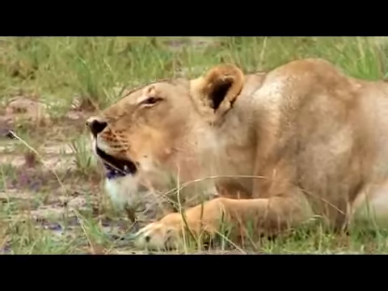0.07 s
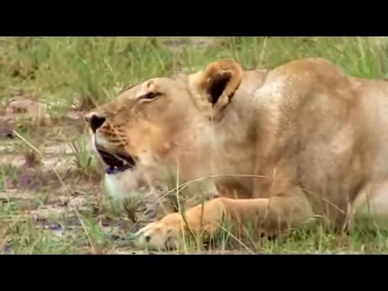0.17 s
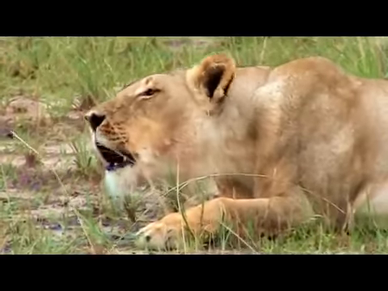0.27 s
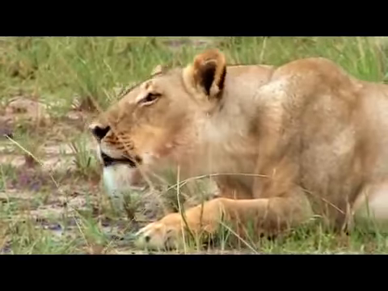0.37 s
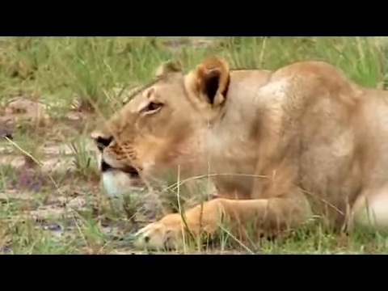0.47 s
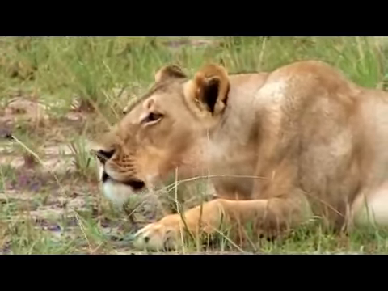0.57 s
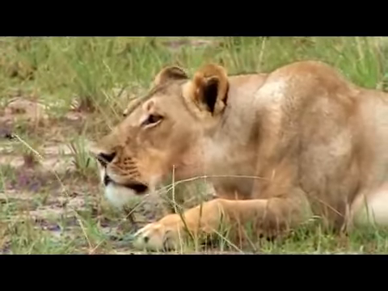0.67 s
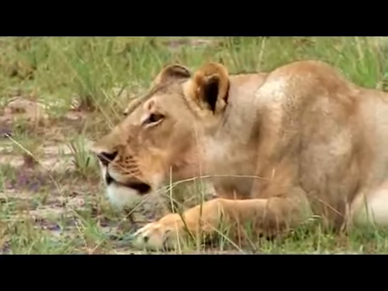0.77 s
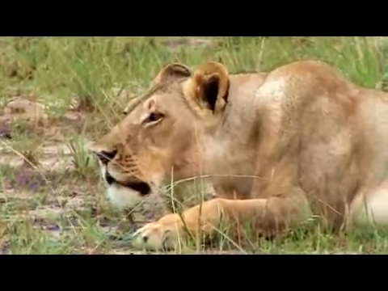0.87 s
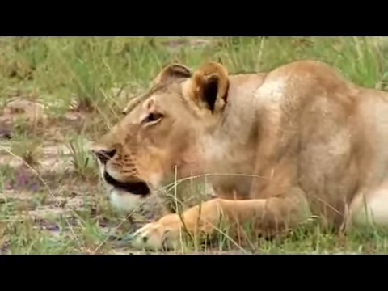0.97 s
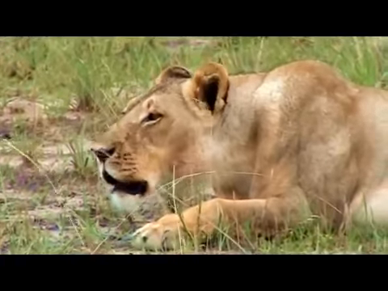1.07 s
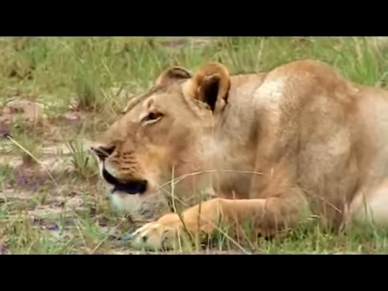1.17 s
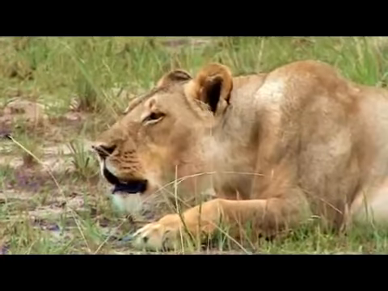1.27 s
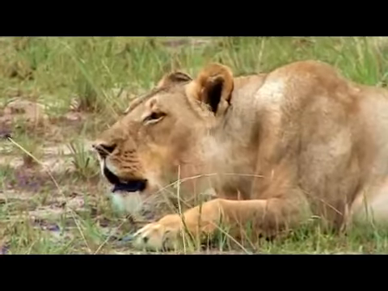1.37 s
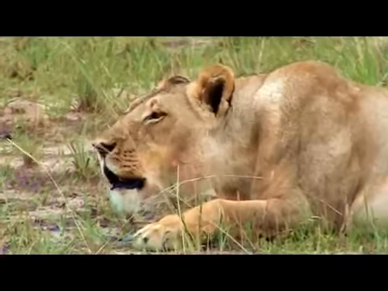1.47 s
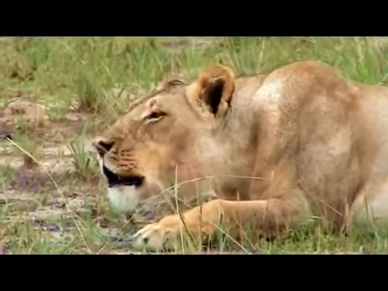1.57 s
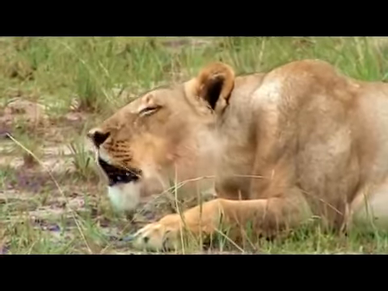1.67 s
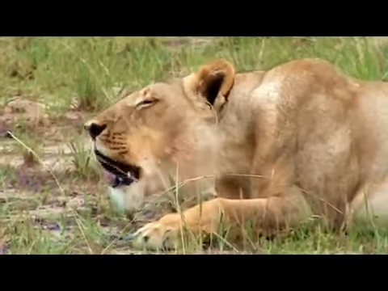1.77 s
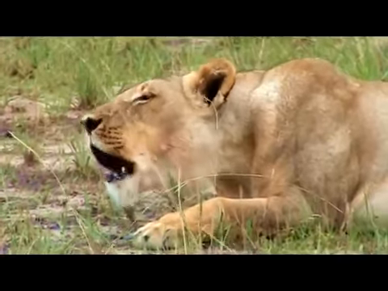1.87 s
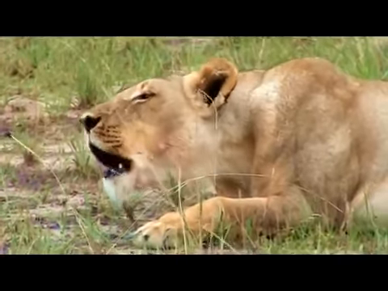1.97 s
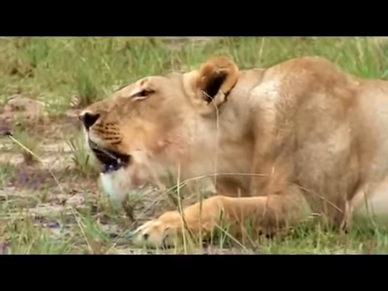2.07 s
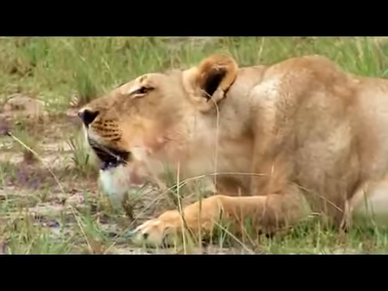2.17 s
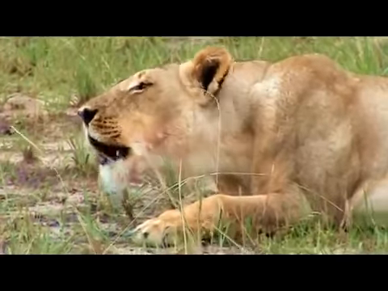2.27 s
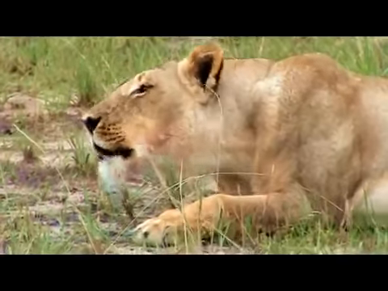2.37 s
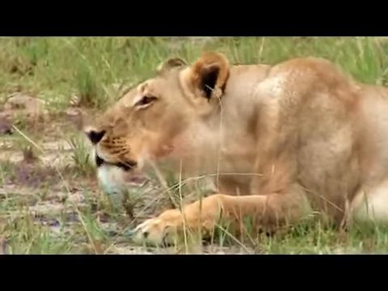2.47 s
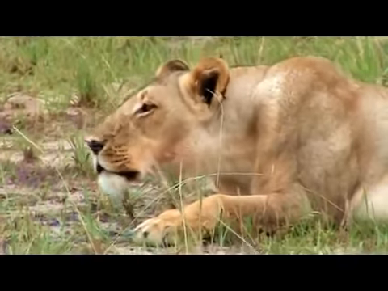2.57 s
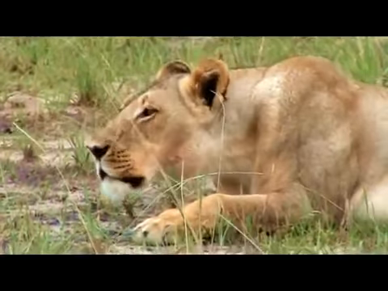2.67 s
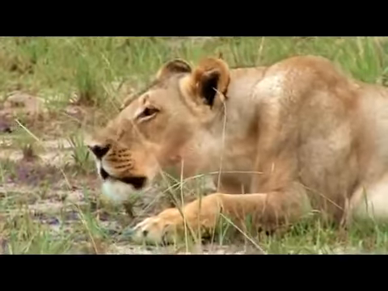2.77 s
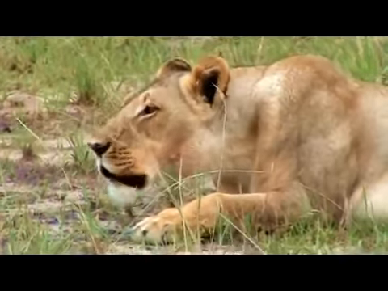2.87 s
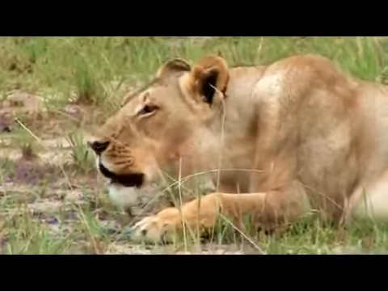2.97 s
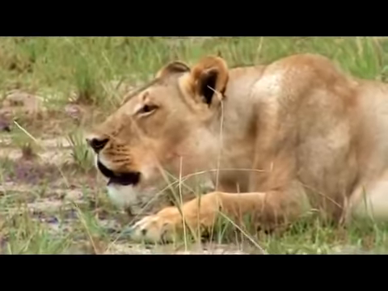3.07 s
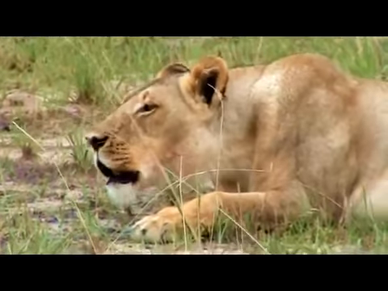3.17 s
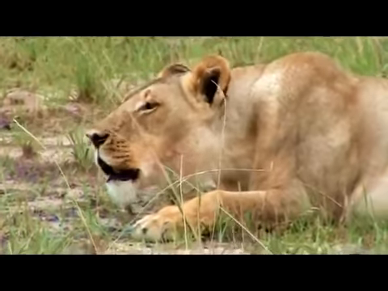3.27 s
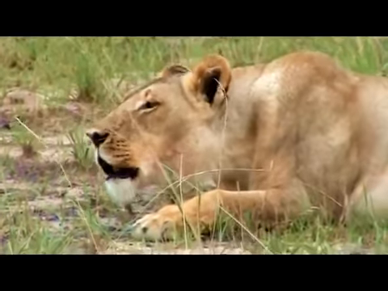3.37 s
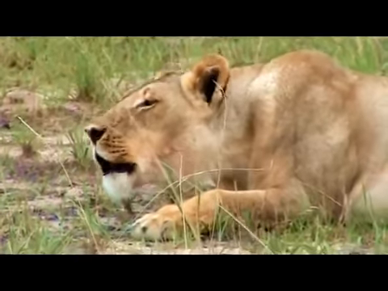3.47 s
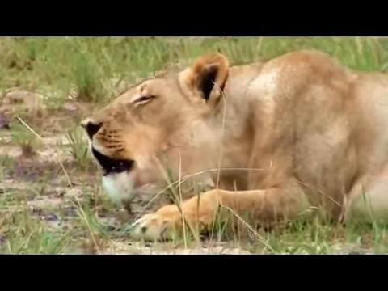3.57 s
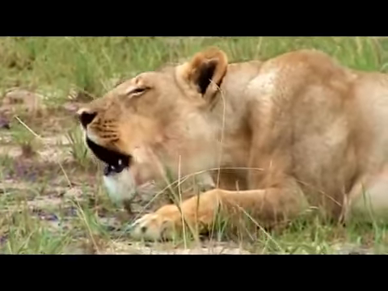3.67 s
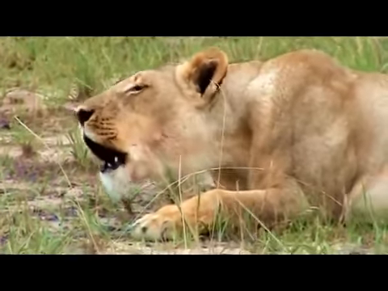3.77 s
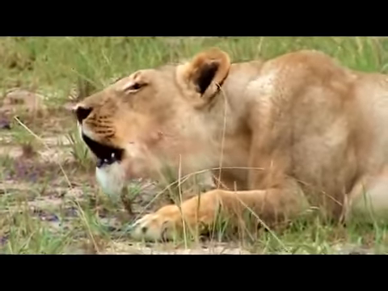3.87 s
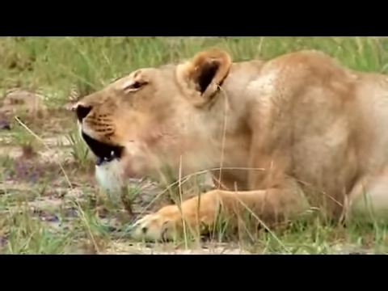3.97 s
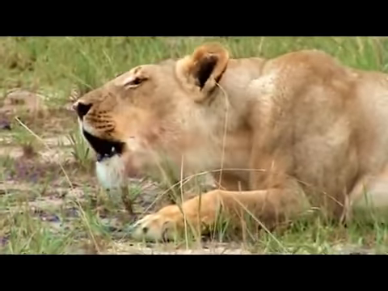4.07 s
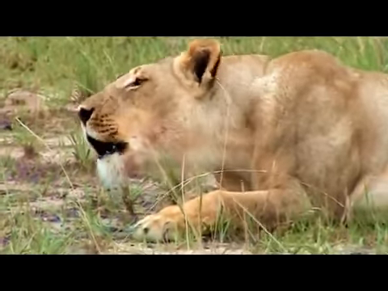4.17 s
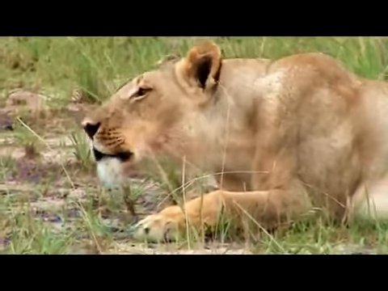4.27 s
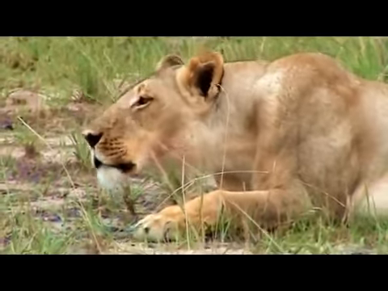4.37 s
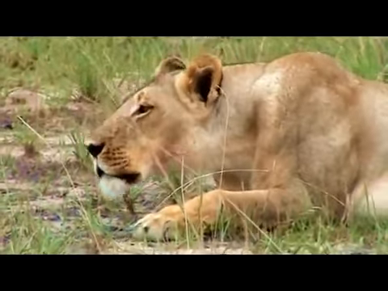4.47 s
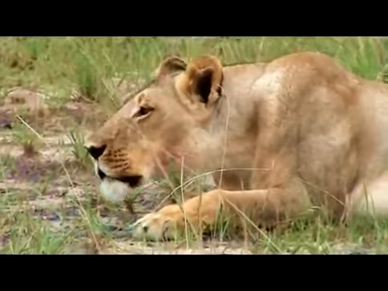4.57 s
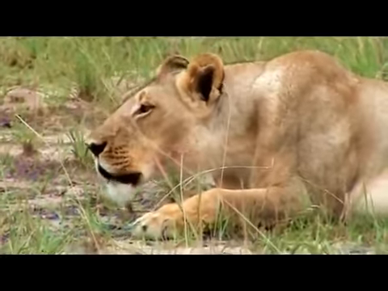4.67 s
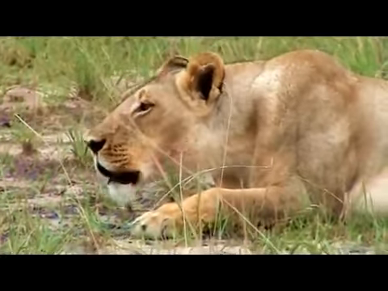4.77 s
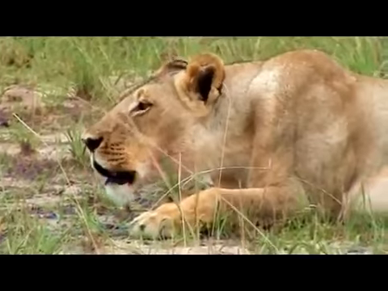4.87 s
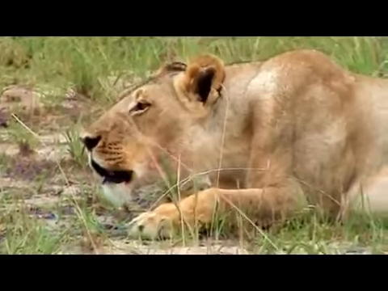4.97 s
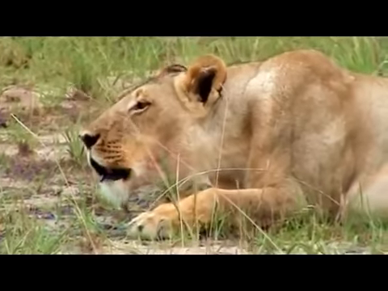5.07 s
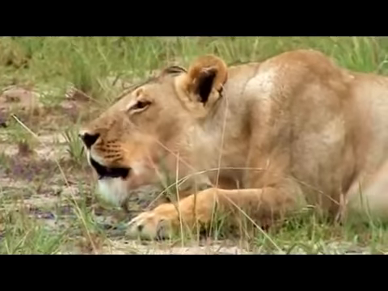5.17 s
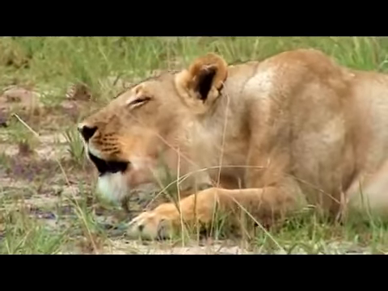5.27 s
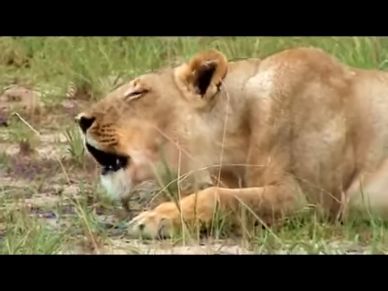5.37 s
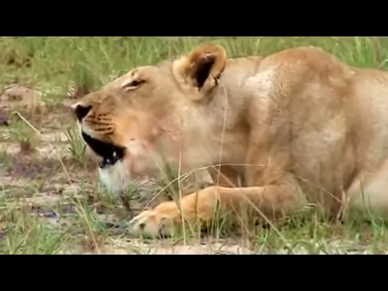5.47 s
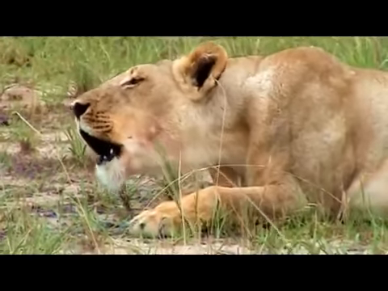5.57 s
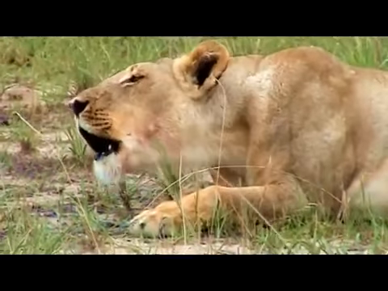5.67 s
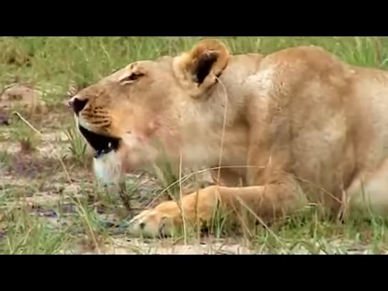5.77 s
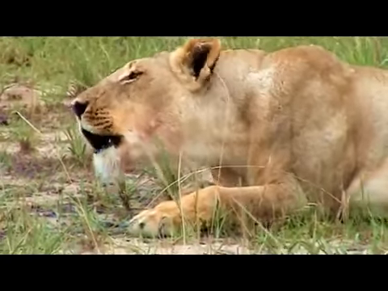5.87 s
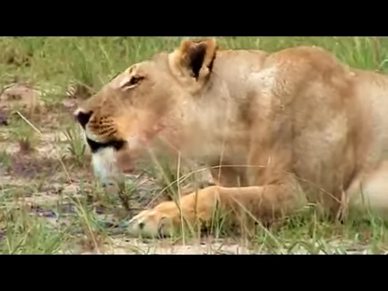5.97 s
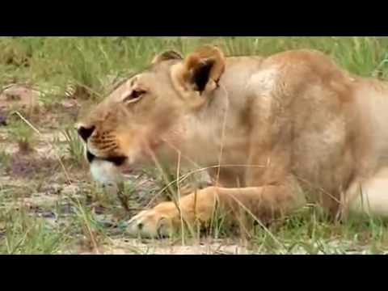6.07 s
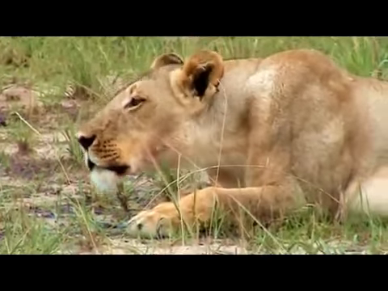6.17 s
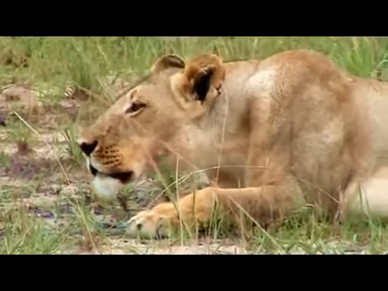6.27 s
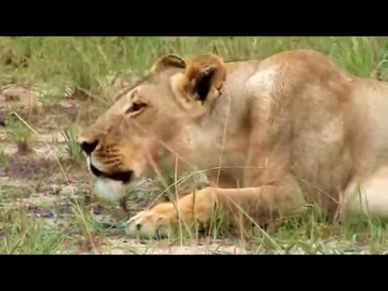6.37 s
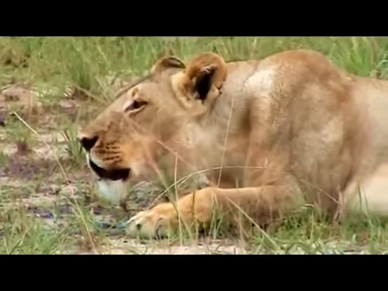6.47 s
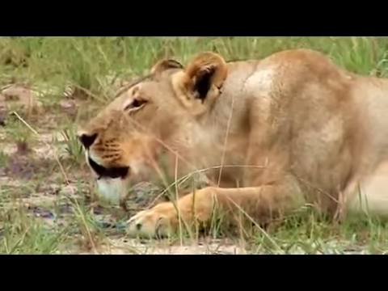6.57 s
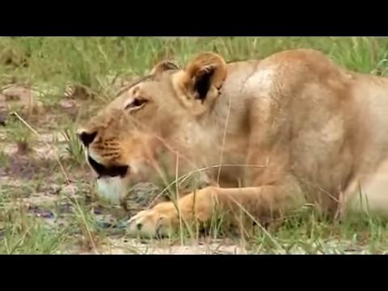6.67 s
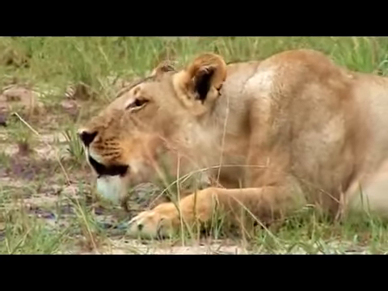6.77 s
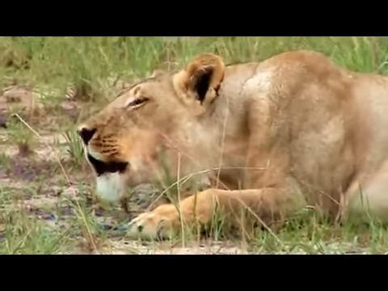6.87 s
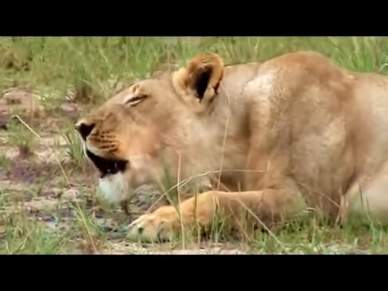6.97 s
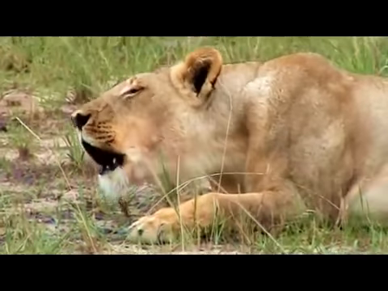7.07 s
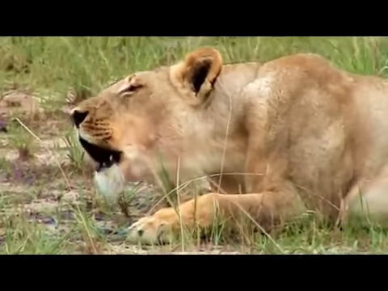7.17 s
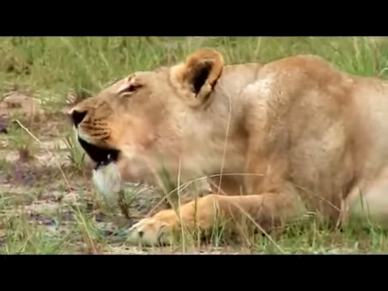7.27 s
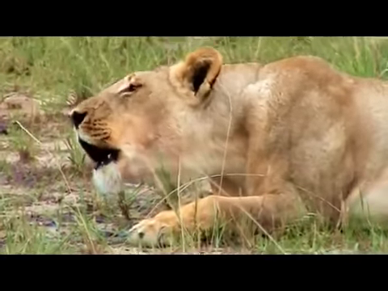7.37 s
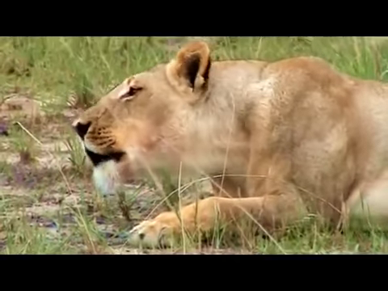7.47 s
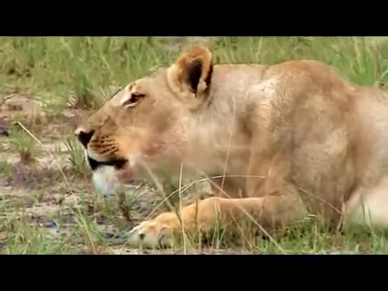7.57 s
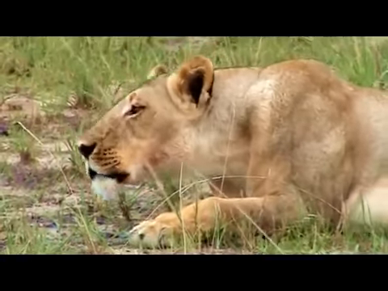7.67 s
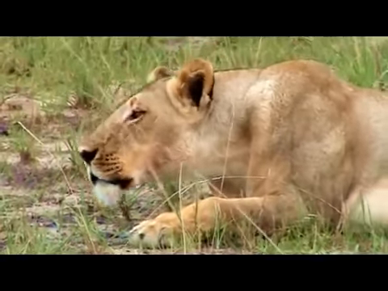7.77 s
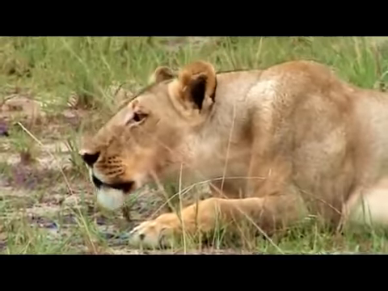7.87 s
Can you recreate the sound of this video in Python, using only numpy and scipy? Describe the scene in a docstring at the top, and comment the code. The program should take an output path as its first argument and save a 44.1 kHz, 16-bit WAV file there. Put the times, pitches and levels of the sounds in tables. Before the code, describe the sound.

A lioness roars five times close by in open grassland, with a dark echo and faint birds and insects between.

```python
"""A lioness roars on the plain

A lioness lies in open grassland and roars five times, close to the microphone. Her heavy vocal folds
ring her throat and mouth: each roar starts hoarse, locks into a clean low moan, breaks into a rasp
and ends in a slack flutter. Her tongue and lips click wetly. The plain returns a long dark echo;
small birds, insects, distant air and an electric hum sound faintly between the roars."""
import sys
import numpy as np
from scipy import signal
from scipy.fft import rfft, irfft, next_fast_len
from scipy.io import wavfile
from scipy.ndimage import uniform_filter1d

SR = 44100
rng = np.random.default_rng(int(sys.argv[2]) if len(sys.argv) > 2 else 0)


def to_wav(sig):
    """Store sig (one row per channel, or 1-D mono) as 16-bit WAV at the path in sys.argv[1].

    Samples outside -1..1 are clipped; the rate is SR.
    """
    pcm = np.clip(np.atleast_2d(sig), -1, 1) * 32767
    pcm = np.round(pcm).astype(np.int16)
    wavfile.write(sys.argv[1], SR, pcm.T)  # frames by channels


N = 348831


def lioness(flutter_lag_s=.043):
    """Five roars, each with a flutter just after she lets go, and wet clicks of tongue and lips."""
    # The roars: start_s, moan_s, rasp_s, release_s, crest_s (top of the pitch arch), crest_hz,
    # moan_roughness (0-1), moan_brightness_db, widest_jaw (0-1)
    roars = [(-.146, .067, .289, .507, -.01, 220, .1, .8, .85),
             (1.837, 2.009, 2.315, 2.534, 2.085, 210, .08, 2, 1),
             (3.718, 3.924, 4.176, 4.38, 3.975, 198, 0.07, -.3, .92),
             (5.475, 5.668, 5.928, 6.104, 5.735, 192, .1, -1.4, .88),
             (7.112, 7.325, 7.452, 7.666, 7.37, 186, .24, 1, .5)]
    # The clicks: start_s, relative_level_db, relative_treble_db
    smacks = [(1.032, -57.5, 16), (2.344, -40.5, 10), (2.546, -31.5, -13), (2.604, -51, -5),
              (4.487, -49.5, -6.5), (6.178, -42, -13.5), (6.29, -35, -23.5)]
    out = np.zeros(N)
    for row in roars:
        release_s = row[3]
        add(out, *roar(row))
        add(out, *flutter(release_s + flutter_lag_s))
    for row in smacks:
        add(out, *smack(*row))
    return out


def roar(row, puff_gain=4.4, dip_half_s=.011):
    """Heavy vocal folds swing evenly or chaotically; their pulses and puffs of air ring the throat."""
    # Resonances of the long throat, the upper mouth and the teeth: shut_hz, open_hz, width_hz, level_db
    throat_tones = [(245, 266, 110, -.5), (405, 475, 55, 5.5), (500, 545, 48, 1), (566.5, 690, 60, -.5),
                    (813, 850, 61.4, 2), (911.4, 965, 82, -1.2), (1204, 1265, 130, -10)]
    mouth_tones = [(1380, 1800, 120, -1), (1810, 1850, 260, -2.5), (2060, 2600, 300, -8),
                   (2405, 2680, 190, -2.5), (3130, 2950, 140, 0)]
    teeth_tones = [(5620, 6800, 600, 1), (7000, 8600, 1200, -2.5)]
    # Rushing air in the rasp and in the clean moan: pitch_hz, level_db
    rasp_air = [(1940, -33.5), (3300, -2.5), (4060, -4), (4470, -2.5), (4850, -7), (5790, 0.5),
                (6840, -2.5), (7370, -2), (10900, -12.5), (12200, -20.5), (13000, -25)]
    moan_air = [(1940, -35.5), (3300, -3), (3450, -9.5), (4250, -9), (4470, -5.5), (5370, -12), (5920, -4),
                (7760, -2.5), (11000, -7.5), (12200, -19), (13000, -29.5)]
    # Brief dips of the lowest tone, which is thin at the first roar's high start
    # and drops out where the voice cracks: time_s, dip_db
    dips = [(.005, 8), (.025, 6), (.047, 9), (.07, 4), (.3, 4.5), (.347, 6), (1.937, 13), (1.986, 10),
            (2.327, 5.5), (2.415, 6.5), (3.811, 11), (3.866, 6), (3.895, 9), (4.183, 7), (5.572, 6),
            (5.635, 9), (5.94, 5), (7.21, 5), (7.295, 13), (7.458, 9), (7.555, 5)]
    t, hz, rough, jaw, (chest_db, throat_db, lips_db, upper_db, hiss_db) = roar_controls(row)
    size = len(t)
    lowest_tone, overtones, flow = vocal_folds(hz, rough)
    pulses = (1 - rough) * overtones
    puffs = unit((.17 + flow) * rng.standard_normal(size))
    drive = pulses + puff_gain * rough * puffs
    # a little of the drive leaks past the resonances
    lower = jaw_resonances(drive, throat_tones, jaw) + amp(-29) * drive - amp(-18) * pulses
    lower = side_cavities(lower, jaw)
    upper = jaw_resonances(drive + .19 * puffs, mouth_tones, jaw) - amp(-19) * drive
    upper = side_cavities(upper, jaw)
    dip_db = sum(db * bump(t, s, dip_half_s) for s, db in dips)
    # the lowest tone sits on a resonance and comes out almost pure
    voice = amp(chest_db - dip_db) * steady(resonate(lowest_tone, hz, width_hz=150))
    voice += amp(throat_db) * steady(band(lower, 170, 614))
    voice += amp(lips_db) * steady(band(lower, 640, 1340, order=14))
    voice += amp(upper_db) * steady(band(upper, 1300, 2900, order=16))
    voice = band(voice, 106, 5000, order=24)
    # air rushes past the teeth in time with the folds, and thuds below the voice as the roar runs out
    rush = (.36 + flow) * rng.standard_normal(size)
    rush = side_cavities(rush + .6 * jaw_resonances(rush, teeth_tones, jaw), jaw)
    harsh = amp(1) * rough * unit(colour(rush, rasp_air))
    soft = (1 - rough) * unit(colour(rush, moan_air))
    thud = np.linspace(0, 1, size) ** 2 * unit(band(rng.standard_normal(size), 38, 65, order=6))
    voice += amp(hiss_db) * (harsh + soft + amp(-6) * thud)
    edge_fade = np.clip(np.minimum((t - t[0]) / .0018, (t[-1] - t) / .014), 0, 1)
    return t[0], voice * edge_fade


def roar_controls(row):
    """How one roar moves: times, pitch, roughness, jaw opening and the level of each voice part."""
    # Five parts of the voice, low to high: opening_db, moan_db, rasp_db, swell_db, fade_db_per_s,
    # fade_lag_s (after the release), surge_db (at strength 1), brightness_share
    parts = [(-9.1, -6.3, -9.5, 43, 230, -.044, -2.3, -.2), (-21.5, -27.6, -24, 34, 260, -.003, 8.4, -.45), (-26.6, -30.5, -26, 37, 275, -.007, 3.9, 1.15), (-43.5, -45.5, -41.3, 28, 250, .025, 3.5, .45), (-46.9, -53.7, -46, 40, 260, .026,
                                                                          3.9, .75)]
    # Surges just before the moan and just after the rasp begins: lag_s, half_length_s, strength
    moan_surge = (-.023, .025, .63)
    rasp_surge = (.018, .043, .98)
    # Shoves of the flanks: time_s, half_length_s, strength (below 0 the voice thins), brightness_db
    shoves = [(.086, .026, .5, 3.5), (.318, .016, .3, 3), (.384, .013, .5, 2.3), (.455, .023, 1.2, 2.5),
              (.504, .03, .4, 7), (1.982, .011, .5, 3), (2.103, .034, .8, .3), (2.348, .02, .4, .5),
              (2.463, .026, .5, -.3), (2.503, .018, .5, 4), (3.805, .013, .4, 1.5), (4.215, .016, .5, 1),
              (4.325, .026, .75, 1.4), (5.565, .018, .25, 2.5), (5.994, .022, -.3, 5.3),
              (6.042, .021, .7, -2.5), (6.08, .013, .8, 4.7), (7.244, .025, .15, 4.3),
              (7.522, .015, .4, 4.2), (7.586, .011, .6, 1.5), (7.652, .03, .65, 4.3)]
    start_s, moan_s, rasp_s, release_s, crest_s, crest_hz, moan_rough, moan_bright_db, widest_jaw = row
    opening_hz, arch_foot_hz, rasp_hz, spent_hz = 163, 180, 162, 144
    attack_s, tail_s, leap_s, drop_s = .041, .15, .06, .07
    opening_rough, rasp_rough = .42, .72
    jaw_shut, jaw_open_s, jaw_close_s, jaw_sag_per_s = .08, .13, .16, .7
    t = np.arange(max(start_s, 0), release_s + tail_s, 1 / SR)

    def stages(opening, moan, rasp, into_s=.073, out_s=.063, early_s=0, late_s=0):
        """Glides from the opening value to the moan's, then to the rasp's."""
        first = opening + (moan - opening) * ramp(t, moan_s - early_s, into_s)
        return first + (rasp - first) * ramp(t, rasp_s + late_s, out_s)

    arch = arch_foot_hz + (crest_hz - arch_foot_hz) * bump(t, crest_s, half_s=.115)
    sinking = np.interp(t, [rasp_s + drop_s, release_s], [rasp_hz, spent_hz])
    ahead_s = max(moan_s - crest_s, 0)  # pitch and jaw are up by the crest, even if the moan comes later
    hz = stages(opening_hz, arch, sinking, leap_s, drop_s, ahead_s + leap_s / 2, drop_s / 2)
    rough = np.clip(stages(opening_rough, moan_rough, rasp_rough, into_s=.11, out_s=.16), 0, 1)
    gape = widest_jaw * (1 - jaw_sag_per_s * np.maximum(t - moan_s, 0))
    jaw = stages(jaw_shut, gape, jaw_shut, jaw_open_s, jaw_close_s,
                 ahead_s + jaw_open_s / 2, jaw_close_s / 2)
    surge = sum(strength * bump(t, s, half_s) for s, half_s, strength, _ in shoves)
    for s, (lag_s, half_s, strength) in ((moan_s, moan_surge), (rasp_s, rasp_surge)):
        surge += strength * bump(t, s + lag_s, half_s)
    bright_db = stages(0, moan_bright_db, 0) + sum(db * bump(t, s, half_s) for s, half_s, _, db in shoves)
    levels = []
    for opening_db, moan_db, rasp_db, swell_db, fade_db_per_s, fade_lag_s, surge_db, share in parts:
        held = stages(opening_db, moan_db + (rasp_db - moan_db) * moan_rough / rasp_rough, rasp_db)
        swell = -swell_db * np.exp(-((t - start_s) / attack_s) ** 1.3)
        fade = fade_db_per_s * np.maximum(t - release_s - fade_lag_s, 0)
        levels.append(held + swell - fade + surge_db * surge + share * bright_db)
    return t, hz, rough, jaw, levels


def vocal_folds(hz, rough, jitter=.06, shimmer=.5, sway_db=4.5):
    """The folds chop the breath into pulses; returns their swing, its overtones and the air flow."""
    size = len(hz)
    # chaos makes each cycle differ in length and in force
    cycles = np.cumsum(hz * (1 + jitter * rough * wander(size, 90))) / SR
    cycles += .03 * rough * wander(size, 180)
    force = np.exp(shimmer * rough * wander(size, 45))
    overtones = sum(amp(sway_db * wander(size, 14)) * np.cos(2 * np.pi * k * cycles) / k ** .8
                    for k in range(2, 20))
    flow = force * np.exp(-(cycles % 1))
    return force * np.sin(2 * np.pi * cycles), force * unit(overtones), flow


def jaw_resonances(x, tones, jaw):
    """Air in the throat and mouth rings at pitches that move as the jaw opens."""
    out = 0
    for shut_hz, open_hz, width_hz, db in tones:
        hz = shut_hz + (open_hz - shut_hz) * jaw
        out = out + amp(db) * resonate(resonate(x, hz, width_hz), hz, width_hz)
    return out


def side_cavities(x, jaw):
    """Side pockets of the airway swallow narrow bands of the sound."""
    # The swallowed bands: shut_hz, open_hz, width_hz
    notches = [(306, 342, 39), (1817, 2000, 130), (2800, 2930, 160), (4100, 4400, 240)]
    for shut_hz, open_hz, width_hz in notches:
        x = x - resonate(x, shut_hz + (open_hz - shut_hz) * jaw, width_hz)
    return x


def flutter(peak_s, level_db=-29.2, hz_at_peak=58.5, rise_s=.047, fall_s=.083):
    """The folds go slack: a few slow flaps that sink in pitch, then linger faintly."""
    t = np.arange(-.12, .19, 1 / SR)
    hz = hz_at_peak * np.exp(-5.5 * np.minimum(t, .02)) * (1 + .046 * wander(len(t), 40))
    swell = bump(t, 0, np.where(t < 0, rise_s, fall_s))
    linger = amp(-14) * signal.windows.tukey(len(t), .5)
    return peak_s + t[0], amp(level_db) * (swell + linger) * sine(hz)


def smack(start_s, relative_db, treble_db, decay_s=.0039):
    """A film of saliva snaps and rings the mouth."""
    # The mouth's ring: pitch_hz, width_hz, level_db
    mouth_tones = [(670, 80, 5.5), (1140, 140, -3.5), (1480, 89, -16), (2010, 79, -14), (2640, 85, -12.5)]
    t = np.arange(0, .04, 1 / SR)
    snap = rng.standard_normal(len(t)) * np.exp(-t / decay_s)
    ring = sum(amp(db) * resonate(snap, hz, width_hz) for hz, width_hz, db in mouth_tones)
    body = unit(band(ring, 500, 2000, order=6))
    treble = amp(treble_db - 3.5) * unit(band(snap, 1900, 8000, order=6))
    return start_s, amp(relative_db - 5.5) * unit(body + treble)


def microphone_pair(x):
    """Each pitch reaches the two close microphones with a slightly different level and timing."""
    # How much louder the left is: pitch_hz, left_minus_right_db
    lean = [(100, 0), (420, .7), (480, 0), (550, 1.8), (690, -1.9), (800, 1.4), (960, 4.2), (1150, 2.5),
            (1320, 6.5), (1520, -6), (1820, -7.5), (2050, -.7), (2600, -1.5), (3500, .3), (4400, 3.5),
            (5500, 0)]
    # How far ahead the left is: pitch_hz, lead_radians
    lead = [(500, 0), (620, -.25), (780, .72), (1200, -.1), (1430, -.9), (1900, .5), (2300, .05),
            (4500, .1)]
    return np.array([shaped(x, lambda f: amp(k * read(lean, f)) * np.exp(1j * k * read(lead, f)))
                     for k in (.5, -.5)])


def ground_scatter(x, decay_s=.008):
    """Grass and soil scatter the voice for a few milliseconds, differently to left and right."""
    # Level of the left-right difference: pitch_hz, gain_db
    side_levels = [(60, -18), (180, -35.5), (400, -19), (480, -14), (650, -18), (1000, -17), (1200, -20),
                   (1500, -6), (2350, -19), (2750, -9), (3200, -15), (4500, -7), (7000, -20), (9500, -12),
                   (12000, -24)]
    t = np.arange(0, .04, 1 / SR)
    bounces = rng.standard_normal(len(t)) * np.exp(-t / decay_s)
    scatter = signal.fftconvolve(x, bounces / np.linalg.norm(bounces))[:N]
    return colour(scatter, side_levels) * np.array([[1], [-1]])


def plain_echo(x, width=.2, build_s=.04, echoes_per_s=2000):
    """Scattered echoes from bushes and far trees; the low voice carries longest."""
    # The echo: pitch_hz, level_db, ring_s (time to fall by 60 dB)
    echo = np.array([(50, -13.5, .75), (100, -17.5, 1), (157, -27, 1.9), (300, -22.5, 1.2),
                     (800, -25.5, 0.84), (2500, -13, 0.62), (8000, -36.5, .4)])
    size = 2 * SR
    bounces = rng.standard_normal((2, size)) * (rng.random((2, size)) < echoes_per_s / SR)
    hz, t, spectrum = signal.stft(bounces, SR, nperseg=1024)
    level_db, ring_s = (read(echo[:, [0, k]], hz)[:, None] for k in (1, 2))
    equal_energy = np.sqrt(2 * np.log(1000) / ring_s / echoes_per_s)
    spectrum *= amp(level_db - 60 * t / ring_s) * equal_energy * np.minimum(t / build_s, 1)
    middle, side = signal.istft(spectrum, SR, nperseg=1024)[1]
    left_right = np.array([middle + width * side, middle - width * side])
    return signal.fftconvolve(x[None], left_right, axes=1)[:, :N]


def birds(trill_gap_s=.031):
    """Single notes and quick five-note trills from the grass."""
    # Single notes: start_s, length_s, start_hz, end_hz, relative_level_db
    notes = [(0.819, 0.015, 5410, 2097, -55), (3.204, 0.065, 4800, 4580, -73),
             (3.477, 0.05, 2846, 2600, -67.5), (4.595, 0.018, 5400, 2100, -58),
             (4.845, .02, 5400, 2220, -54), (5.103, 0.014, 5400, 2150, -54.5),
             (5.361, 0.015, 5400, 2180, -55), (6.287, 0.09, 2680, 2410, -59.5),
             (6.48, .12, 2400, 2170, -65), (6.977, 0.055, 4200, 3880, -64), (7.023, 0.062, 3850, 3590, -64)]
    # Trills: start_s, relative_level_db
    trills = [(.885, -66), (1.715, -67), (2.94, -61.5), (5.26, -64), (6.52, -65), (6.771, -77)]
    out = np.zeros(N)
    for start_s, *note in notes:
        add(out, start_s, bird_note(*note))
    for start_s, db in trills:
        for k in range(5):
            note_s = start_s + k * trill_gap_s * rng.uniform(.72, 1.2)
            add(out, note_s, bird_note(.02, 4600, 4120, db + rng.normal(0, 1.1)))
    return out


def bird_note(length_s, start_hz, end_hz, db, waver=.016, flicker_db=2):
    """A far bird's falling whistle, unsteady after its way through the grass."""
    size = int(length_s * SR)
    hz = np.geomspace(start_hz, end_hz, size) * (1 + waver * wander(size, 200))
    swell = amp(db + flicker_db * wander(size, 80)) * signal.windows.tukey(size, .7)
    return swell * sine(hz)


def air_and_insects(air_db=-57.5):
    """Distant air is a broad, low noise; insects shrill in narrow bands above it."""
    # Air over the plain: pitch_hz, relative_level_db
    air = [(15, -26.5), (25, -3.5), (103, -9), (123, -10), (156, 1), (370, -14), (548, -4.5), (609, -13.5),
           (694, -7.5), (1560, -15), (5200, -22), (13000, -28)]
    # The insects: pitch_hz, width_hz, level_db
    insects = [(5140, 550, -72.5), (7120, 160, -76), (6400, 340, -76), (10700, 250, -83.5)]
    out = amp(air_db) * unit(colour(rng.standard_normal(N), air))
    for hz, width_hz, db in insects:
        shrill = shaped(rng.standard_normal(N), lambda f: 1 / (1 + (2 * (f - hz) / width_hz) ** 2))
        out += amp(db) * unit(shrill)
    return out


def background():
    """Air and insects come from all sides; a faint electric hum sits in the middle."""
    # The hum: pitch_hz, level_db
    hum_tones = [(50, -72), (100, -68)]
    # How wide the far sounds spread: pitch_hz, side_minus_middle_db
    spread = [(130, -16), (300, -2), (600, 1.3), (4000, 1.3), (7000, -1.5), (10000, -3), (12000, -10)]
    t = np.arange(N) / SR
    hum = sum(amp(db) * np.sqrt(2) * np.sin(2 * np.pi * hz * t) for hz, db in hum_tones)
    middle = air_and_insects() + hum
    side = colour(air_and_insects(), spread)
    return middle + side * np.array([[1], [-1]])


def amp(db):
    """Turns decibels into a gain."""
    return 10 ** (np.asarray(db) / 20)


def unit(x):
    """Scales to an average level (rms) of 1."""
    return x / np.sqrt(np.mean(x ** 2) + 1e-20)


def steady(x, size=1500):
    """Holds the level at 1 from moment to moment; single pulses keep their shape."""
    return x / np.sqrt(abs(uniform_filter1d(uniform_filter1d(x ** 2, size), size)) + 1e-12)


def read(points, hz):
    """Reads between the rows of a table, on a musical (logarithmic) pitch scale."""
    f, value = np.transpose(points)
    return np.interp(np.log(hz + 1), np.log(f + 1), value)


def shaped(x, gain):
    """Filters by a gain given as a function of frequency."""
    size = next_fast_len(x.shape[-1] + 4096)
    return irfft(rfft(x, size) * gain(np.fft.rfftfreq(size, 1 / SR)), size)[..., :x.shape[-1]]


def colour(x, table):
    """Filters by a table of pitch_hz, gain_db."""
    return shaped(x, lambda f: amp(read(table, f)))


def band(x, lo_hz, hi_hz, order=12):
    """Keeps what lies between two pitches; a higher order cuts more steeply."""
    return shaped(x, lambda f: 1 / np.sqrt((1 + (lo_hz / (f + 1e-3)) ** order)
                                           * (1 + (f / hi_hz) ** order)))


def resonate(x, hz, width_hz):
    """A resonance of gain 1 at a fixed or moving pitch."""
    turn = np.exp(2j * np.pi * np.cumsum(hz * np.ones(len(x))) / SR)
    decay = np.exp(-np.pi * width_hz / SR)
    return 2 * (turn * signal.lfilter([1 - decay], [1, -decay], x / turn)).real


def sine(hz):
    """A pure tone that follows a pitch curve."""
    return np.sin(2 * np.pi * np.cumsum(hz) / SR)


def wander(size, hz):
    """Random drift of level 1, mostly slower than hz."""
    return unit(shaped(rng.standard_normal(size), lambda f: 1 / (1 + (f / hz) ** 4)))


def ramp(t, s, length_s):
    """A smooth step from 0 to 1, centred on time s."""
    return .5 + .5 * np.sin(np.pi * np.clip((t - s) / length_s, -.5, .5))


def bump(t, s, half_s):
    """A bell curve of height 1 at time s."""
    return np.exp(-((t - s) / half_s) ** 2)


def add(mix, s, sound):
    """Adds a sound at time s."""
    part = mix[max(round(s * SR), 0):][:len(sound)]
    part += sound[:len(part)]


def scene():
    """The lioness close by, with the plain around her."""
    voice = lioness()
    close = microphone_pair(voice) + ground_scatter(voice)
    return close + plain_echo(voice) + amp(-.5) * birds() + background()


def record(dry, ceiling=.93, top_hz=12700):
    """Rounds off the highest peaks, then cuts the highest treble."""
    rounded = dry / (1 + (dry / ceiling) ** 8) ** (1 / 8)
    low_pass = signal.firwin(255, top_hz, window=("kaiser", 8), fs=SR)
    return signal.oaconvolve(rounded, low_pass[None], "same")


dry = scene()
out = record(dry)
to_wav(out)
```